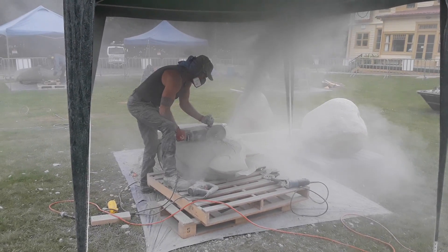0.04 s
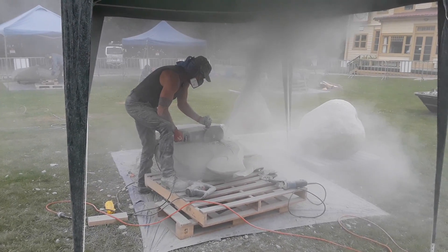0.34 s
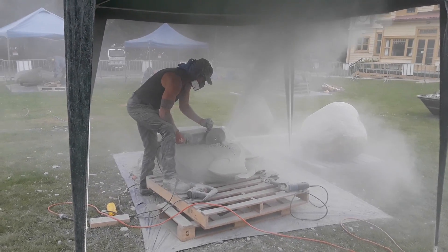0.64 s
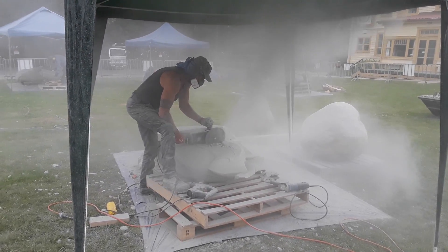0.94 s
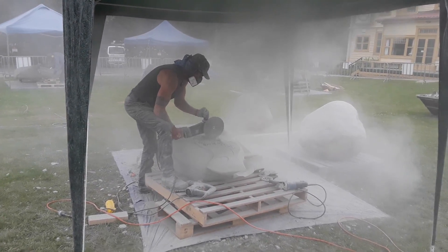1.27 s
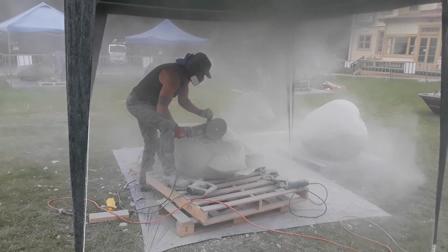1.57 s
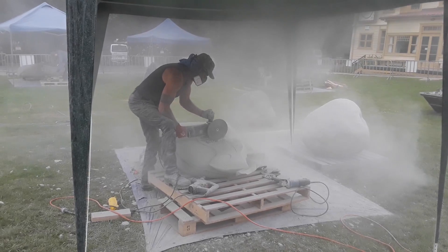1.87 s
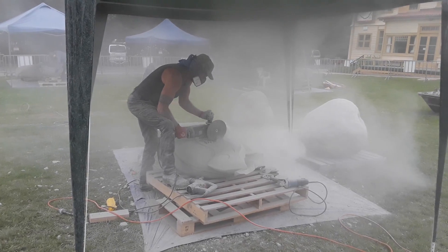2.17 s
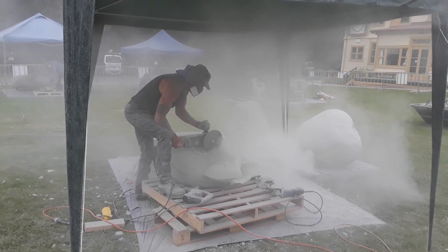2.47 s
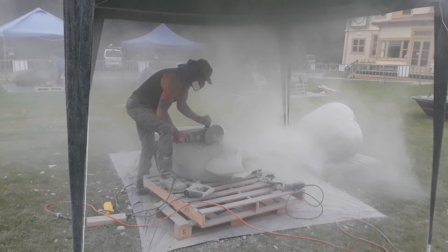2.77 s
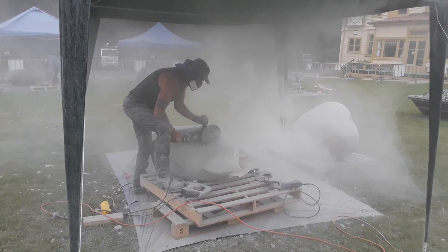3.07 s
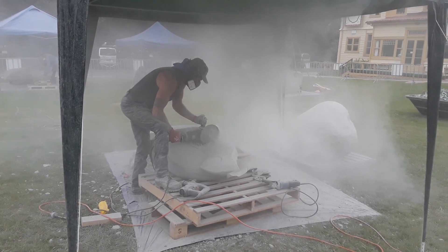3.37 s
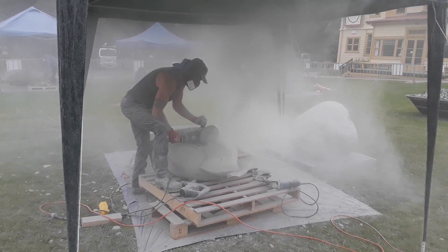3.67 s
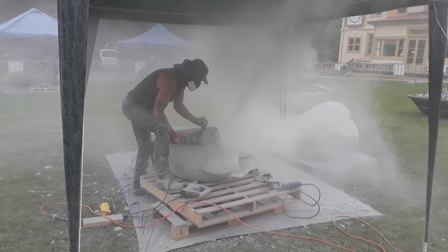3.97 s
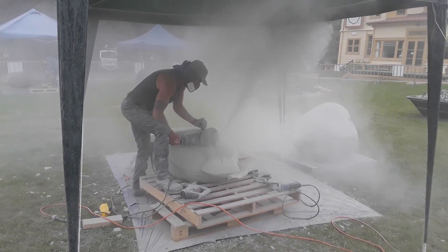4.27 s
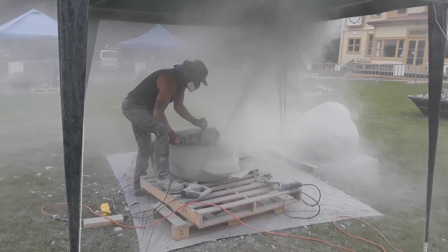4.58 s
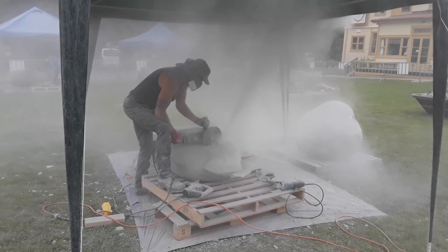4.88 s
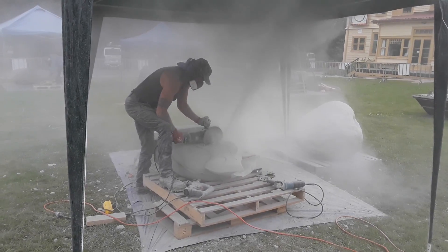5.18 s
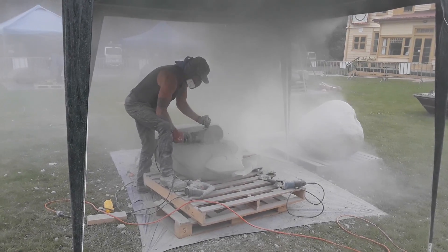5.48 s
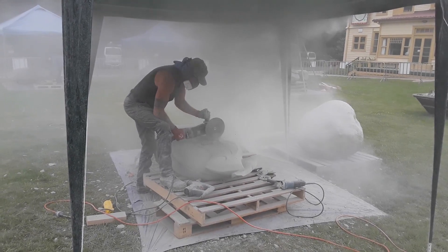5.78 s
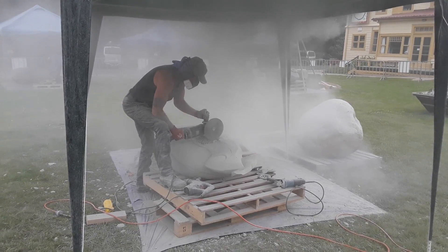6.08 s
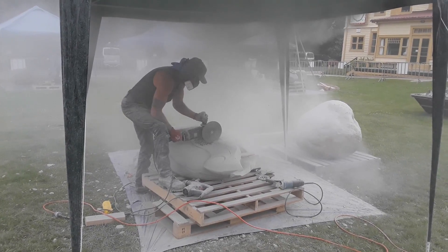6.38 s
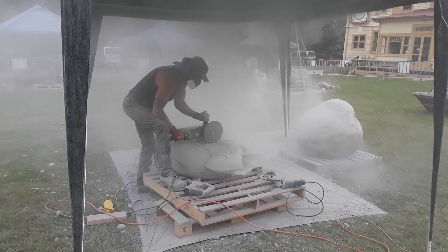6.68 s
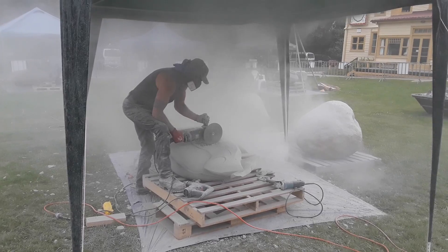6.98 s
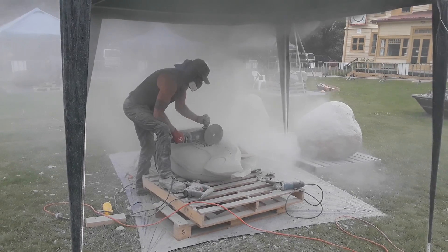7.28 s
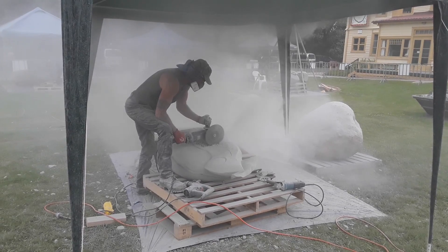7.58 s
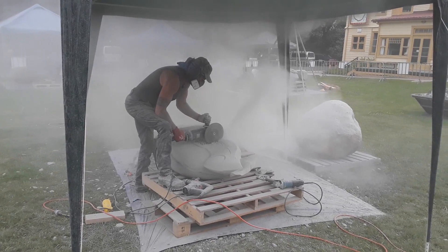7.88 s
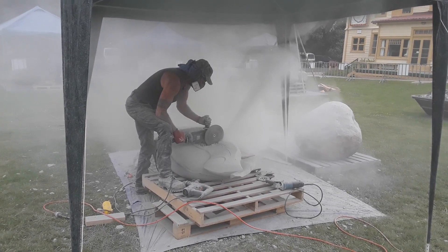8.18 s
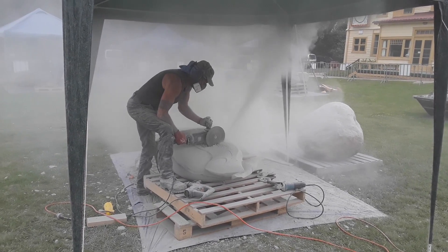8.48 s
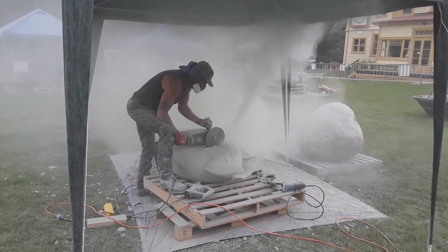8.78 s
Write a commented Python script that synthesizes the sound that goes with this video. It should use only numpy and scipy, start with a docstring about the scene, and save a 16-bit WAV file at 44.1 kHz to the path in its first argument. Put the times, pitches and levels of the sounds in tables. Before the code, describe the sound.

A grinder disc rasps and squeals through a stone block, its motor revving up in two brief pauses and slowing as it digs in.

```python
"""Outdoors, one microphone close to an electric angle grinder cutting a stone block; mono.
At first the rim bites deep and hisses, its grit ringing the steel disc, while the labouring motor hums.
At 1.2 s the disc lifts clear: the motor whines up, the gears rattle, the fan blows. From 1.7 s it skims
and sings, then sinks in and drags the speed down. Near 5.8 s it lifts again over a low drone; at 6.5 s
it comes back squealing and digs in to the end. Now and then a puff of wind catches the microphone."""
import sys
import numpy as np
from scipy import signal
from scipy.fft import rfft, irfft, next_fast_len
from scipy.io import wavfile
from scipy.ndimage import uniform_filter1d, map_coordinates

SR = 44100
rng = np.random.default_rng(int(sys.argv[2]) if len(sys.argv) > 2 else 0)


def bounce(signal):
    """Save signal as a 16-bit WAV file at the path given by the first command-line argument."""
    frames = np.transpose(np.atleast_2d(signal))
    limited = np.clip(frames, -1, 1)
    pcm = np.round(limited * 32767).astype(np.int16)
    wavfile.write(sys.argv[1], SR, pcm)


N = 398663
T = np.arange(N) / SR
SLOW_HZ, FREE_HZ = 59, 84  # turns per second, deep in the stone and running free
CASE_HZ, GRAZE_S = 4096, 0.089  # gear case resonance; how long the rim brushes before it bites


# short jolts and slow, slight swells or dips in the cut's loudness: t/s, half length/s, level change/dB
LEVEL_SWINGS = [(1.114, 0.033, 3.5), (1.733, 0.01, 4.5), (1.867, 0.15, -1), (5.67, 0.036, 0.5),
                (6.467, 0.018, 1), (6.803, .15, 0.5), (7.217, .17, 0.5), (8.4, 0.81, 0.3)]
# spectrum of breaking stone: f/Hz, level/dB
CHIP_SPECTRUM = [(25, -40), (70, -5), (130, -0.5), (300, -0.5), (480, 0), (680, 1.5), (850, -2), (1150, 1),
                 (1600, -8.5), (3000, -40)]

def cutting(speed, bite):
    """The disc in the stone: ringing scrape and crumbling chips, louder the deeper it bites."""
    light = lightness(speed)
    swing_db = sum(db * np.exp(-((T - s) / half_s) ** 2) for s, half_s, db in LEVEL_SWINGS)
    # dust and chips take a moment to build up as a new groove forms
    groove_db = -3.5 * sum((T > back - GRAZE_S) * np.exp(-np.abs(T - back) / 0.12)
                           for _, back, *_ in LIFTS)
    doublings = np.log2(bite)
    scrape_db = -16.17 + 1.1 * doublings + 2.67 * light
    body_db = -20.2 + 0.94 * doublings - light + 0.47 * wobble(14)
    dust_db = -14.34 + 2.15 * doublings - 0.91 * light + groove_db + 0.76 * wobble(25)
    chips_db = -30 + 4.9 * doublings - 3 * light + groove_db
    # a glancing disc chatters, and its runout presses once per turn
    glancing = np.clip(1 - bite / 0.33, 0, 1)
    runout = np.sin(2 * np.pi * np.cumsum(speed) / SR)
    flutter_db = 0.4 * wobble(12) + 0.24 * wobble(45) + 0.38 * wobble(500)
    chatter_db = glancing * (1.5 * wobble(130) + 0.58 * runout)
    pressure = amp(flutter_db + chatter_db + .5 * light * runout)
    scrape = pressure * disc(speed, body_db, scrape_db, dust_db)
    # deep in the stone chips break off at random; a skimming rim buzzes
    chips = rng.standard_normal(N) * amp(3.4 * wobble(420) + 0.75 * wobble(30))
    buzz = 0.72 * light ** 4 * rim(speed, wear_turns=50)
    return amp(swing_db) * (scrape + amp(chips_db) * coloured(chips + buzz, CHIP_SPECTRUM))


# modes of the steel disc: f/Hz when slow, shift/Hz when free, width/Hz, level/dB deep, level/dB skimming
DISC_MODES = [(1404, 10, 35, -15, 19), (1505, 38, 138, -2, 14), (1817, -63, 72, 9.5, 15),
              (1938, -27, 100, 6.5, 11), (2062, 15, 50, 9, 21), (2160, -34, 137, 8, 7),
              (2510, 94, 165, 6.5, 16), (3100, -56, 160, 6, 13), (3208, 51, 69, -1, 17),
              (3617, 68, 58, 0, 21), (3830, 100, 294, -2, 13), (4390, -104, 94, 7.5, 8),
              (4618, 10, 135, 4.5, 20), (5042, -18, 68, -7, 14), (5270, 117, 99, 6, 19),
              (5614, 125, 130, -2, 13), (5885, 34, 51, -5, 15), (6040, 242, 300, -1, 8),
              (6416, 200, 57, 1, 12), (6662, 70, 66, 1, 15), (7193, 21, 117, 4, 10),
              (7417, 200, 109, 5.5, 14), (8170, 37, 370, 5, 7), (8873, 161, 60, 6, 9),
              (9530, 207, 297, 0, 3), (11843, -4, 189, -1, 7), (12683, 223, 70, -2, 7),
              (13245, 193, 120, -2, 2)]
# spectrum of the rim on stone: f/Hz, level/dB
SCRAPE_SPECTRUM = [(600, -20), (1150, -9), (1700, -8), (2300, -6), (3450, -9.5), (4900, -7), (5500, 0.5),
                   (6600, -1.24), (6950, -9.5), (8300, -11.5), (10300, -12.5), (11300, -9), (13300, -1),
                   (15600, -1.5)]
# how strongly the scrape repeats each turn: f/Hz, weight
REPEAT_WEIGHTS = [(200, .12), (900, 0.69), (1500, 0.71), (3000, 0.71), (6000, 0.56), (9000, 0.35),
                  (15000, .4)]

def disc(speed, body_db, scrape_db, dust_db):
    """Repeating and fresh scraping ring the disc; a deep cut damps the modes, and spin shifts them."""
    hz, t, repeating = signal.stft(rim(speed, wear_turns=23.5), SR, nperseg=2048)
    fresh = signal.stft(rng.standard_normal(N), SR, nperseg=2048)[2]
    hz = hz[:, None]
    light = lightness(np.interp(t, T, speed))
    share = np.clip(along(REPEAT_WEIGHTS, hz) * (0.37 + 0.68 * light ** 2), 0, 1)
    scraping = np.sqrt(share) * repeating + np.sqrt(1 - share) * fresh
    power = 1
    for mode_hz, shift_hz, width_hz, deep_db, skim_db in DISC_MODES:
        detune = 2 * (hz - mode_hz - shift_hz * light) / width_hz
        # the angle of the cut drifts, favouring one mode and then another
        mode_db = deep_db + (skim_db - deep_db) * light + 1.7 * wobble(5, t)
        power = power + amp(mode_db) ** 2 / (1 + detune ** 2)
    response = np.sqrt(power) * amp(along(SCRAPE_SPECTRUM, hz)) * hz / np.hypot(hz, 500)
    # the many weak high modes stand out more as the cut lightens
    ripple_depth = along([(1000, 0.26), (4000, 1.0), (9000, 0.44), (14000, 0.97)], hz)
    ripple = ripple_depth * wobble(0.97, hz[:, 0] / 70)[:, None]
    response *= amp((0.9 + 1.7 * light) * ripple)
    # three bands, each at its own level: the disc's body, the scrape, the fine dust
    body = 1 / (1 + (hz / 2900) ** 20)
    dust = 1 / (1 + (7600 / (hz + 1)) ** 20)
    gain = 0
    for band, db in (body, body_db), (1 - body - dust, scrape_db), (dust, dust_db):
        part = response * band
        gain = gain + amp(np.interp(t, T, db)) * part / np.sqrt(np.mean(part ** 2, axis=0))
    return signal.istft(gain * scraping, SR, nperseg=2048)[1][:N]


def rim(speed, wear_turns):
    """The grit pattern of the rim passes once per turn and slowly wears into a new one."""
    grains = 640
    turns = np.cumsum(speed) / SR
    keep = np.exp(-1 / wear_turns)
    grit = rng.standard_normal((2 * grains, grains))
    pattern, _ = signal.lfilter([np.sqrt(1 - keep ** 2)], [1, -keep], grit[1:],
                                axis=0, zi=keep * grit[:1])
    return unit(map_coordinates(pattern.ravel(), [turns * grains], order=3))


# high squeals of the disc and low overtones of its spin: start t/s, end t/s, f/Hz, level/dB
DISC_TONES = [(.06, 0.854, 2080, -27.5), (0.302, .85, 4377, -29.5), (0.879, 1.168, 2104, -23),
              (.9, 1.17, 4400, -22), (1.08, 1.228, 6470, -25), (1.737, 1.87, 2060, -25),
              (1.74, 1.9, 4538, -19.5), (1.76, 1.906, 2530, -26), (1.768, 1.977, 710, -39),
              (1.877, 2.0, 2060, -18.5), (1.89, 1.998, 6530, -22), (2.02, 2.09, 4510, -19),
              (2.133, 2.3, 4631, -25), (2.501, 2.64, 2070, -24), (2.639, 2.73, 1779, -26),
              (2.97, 3.703, 2064, -26), (4.2, 5.2, 4450, -28.5), (5.412, 5.756, 2043, -30),
              (6.448, 7.3, 5380, -26.5), (6.489, 7.666, 2061, -28), (6.551, 7.1, 580, -45),
              (6.6, 7.05, 501, -49), (6.717, 6.9, 2070, -22.5), (6.723, 7.08, 1418, -34),
              (6.967, 7.14, 2630, -27), (7.0, 7.25, 3680, -31), (7.0, 7.48, 7597, -30),
              (7.031, 7.168, 739, -39), (7.052, 7.5, 5750, -26), (7.749, 8.7, 2080, -30)]

def disc_tones(speed):
    """Brief tones swell and die away: high squeals of the disc and low overtones of its spin."""
    out = np.zeros(N + 2 * SR)
    for start, end, hz, db in DISC_TONES:
        t = np.arange(int((end - start + .1) * SR)) / SR
        # a slow, deep cut smears the note
        rough = np.interp(np.interp(start, T, speed), [SLOW_HZ, FREE_HZ], [.6, .12])
        release_db = -60 * np.maximum(t - (end - start), 0) / 0.12
        swell = (1 - np.exp(-t / 0.0056)) * amp(db - 0.3 + release_db + wobble(14, t))
        note = tone(hz, blur_hz=45 + hz * rough / 14, rough=rough, t=t)
        out[round(start * SR):][:len(t)] += swell * note
    return out[:N]


# the disc is lifted clear: lift t/s, back in t/s, scrape fade/s, rattle start t/s,
# tool level change/dB, whistle level/dB, graze level/dB
LIFTS = [(1.2, 1.726, .3, 1.402, -1, -39.5, -45), (5.765, 6.45, 0.205, 5.863, 2, -51, -19)]

def contact():
    """1 while the rim touches the stone: it fades on lifting and returns at once."""
    touching = np.ones(N)
    for lift, back, fade_s, *_ in LIFTS:
        clear = (T > lift) & (T < back)
        touching[clear] = amp(-60 * (T[clear] - lift) / fade_s)
    return uniform_filter1d(touching, size=300)


def graze():
    """Just before it bites, the rim touches too lightly to ring the disc: a dry, fluttering rasp."""
    level = sum(amp(db) * gate(back - GRAZE_S, back, edge_s=.03) for _, back, *_, db in LIFTS)
    rasp = noise([(100, -16), (1000, -9.5), (1700, -1), (3500, 5),
                  (6500, -1), (7500, -11), (10000, -15), (15000, -10)])
    return level * amp(1.8 * wobble(150)) * rasp


# how deep the rim is pressed into the stone: t/s, bite (1 is a full cut)
BITE_DEPTH = [(0.0, 1.004), (0.85, 0.633), (1.02, 0.16), (1.12, 0.469), (1.2, 0.03), (1.73, 0.315),
              (2.15, 0.665), (2.55, 1.037), (4.4, 0.981), (5.2, 0.878), (5.5, 0.144), (5.68, 0.125),
              (5.78, 0.03), (6.45, 0.155), (6.95, 0.231), (7.15, 0.583), (8.0, 1.255), (9.04, 0.862)]

def spindle(touching):
    """The bite, and the turns per second: the load drags the speed down, and inertia makes it lag."""
    idle_hz, drag_hz, inertia_s = 89.78, 31.78, .7
    bite = np.interp(T, *np.transpose(BITE_DEPTH))
    target_hz = idle_hz - drag_hz * bite * touching
    keep = np.exp(-1 / (inertia_s * SR))
    speed, _ = signal.lfilter([1 - keep], [1, -keep], target_hz, zi=[keep * SLOW_HZ])
    return bite, speed


def lightness(speed):
    """0 when the disc is slowed deep in the stone, 1 when it runs free."""
    return np.clip((speed - SLOW_HZ) / (FREE_HZ - SLOW_HZ), 0, 1)


# spectrum of cooling air and brushes: f/Hz, level/dB
FAN_SPECTRUM = [(20, -50), (55, -26), (150, -24), (470, -17), (570, -5.5), (720, -8), (820, -17.5),
                (1250, -11), (1550, -4.5), (2200, 0.5), (2650, -2.5), (3900, 1), (5000, -2.5), (6600, -0.5),
                (6950, -10.5), (9000, -19), (14000, -15.5)]

def motor(speed, load, touching):
    """Fan air and the armature's unbalance grow with speed; the gears whine when unloaded."""
    light = lightness(speed)
    armature_hz = 4.43 * speed
    fan = amp(-29 + 4.5 * light + wobble(90)) * noise(FAN_SPECTRUM)
    unbalance_db = -78 + 32 * light - 4 * touching  # the stone steadies it
    unbalance = amp(unbalance_db) * tone(armature_hz, blur_hz=8.7, rough=.08)
    # twelve pinion teeth mesh per armature turn and excite the gear case
    mesh_hz, case_width_hz = 12 * armature_hz, 1000
    in_tune = 1 / np.hypot(1, 2 * (mesh_hz - CASE_HZ) / case_width_hz)
    mesh = amp(-4) * tone(mesh_hz, blur_hz=110.3, rough=0.53)
    case = (1 - touching) * in_tune * tone(CASE_HZ, blur_hz=50, rough=.3)
    gears = amp(-33.5 - 12 * load + 2.2 * wobble(70)) * in_tune * (mesh + case)
    return fan + unbalance + gears


def rattle(speed):
    """Unloaded gear teeth knock across their play every second turn, each a short, noisy ring."""
    knock_db, spread_db, jitter_s = -17, 2.2, .0015
    out = np.zeros(N + SR)
    t = np.arange(SR // 20) / SR
    envelope = amp(4.5 - 60 * t / .032) * (1 - np.exp(-t / .0014))
    turns = np.cumsum(speed) / SR
    for _, back, _, start, *_ in LIFTS:
        first, last = np.interp([start, back], T, turns)
        for s in np.interp(np.arange(first, last, 2), turns, T):
            late, strength, detune = rng.standard_normal(3)
            hz = CASE_HZ + 12 * (np.interp(s, T, speed) - 77.5) + 35 * detune  # faster rings higher
            ring = np.sin(2 * np.pi * hz * t) + 0.17 * rng.standard_normal(len(t))
            onset = round((s + jitter_s * late) * SR)
            out[onset:][:len(t)] += amp(knock_db + spread_db * strength) * envelope * ring
    return filtered(out[:N], lambda hz: 1 / (1 + (hz / 7000) ** 8))


def whistle():
    """Shortly after each lift the free disc whistles in the air."""
    level = sum(amp(db) * gate(lift + .27, back, edge_s=.08) for lift, back, *_, db, _ in LIFTS)
    return level * (tone(7160, blur_hz=40.6, rough=0.27) + amp(2) * tone(6355, blur_hz=90.4, rough=0.8))


# puffs of wind on the microphone: t/s, peak level/dB
WIND_PUFFS = [(.52, -35), (2.57, -31), (2.8, -32), (3.05, -27), (3.44, -35), (4.38, -38), (4.67, -38),
              (7.68, -29), (7.95, -35), (8.23, -32), (8.65, -32), (8.93, -30)]

def wind():
    """Brief puffs buffet the microphone over a faint, steady rumble."""
    puffs = sum(amp(db) * np.exp(-((T - s) / 0.019) ** 2) for s, db in WIND_PUFFS)
    rumble = noise([(15, -26), (30, -12), (55, -2), (110, -3.5), (200, -6.5), (500, -15), (2000, -90)])
    return (puffs + amp(-64)) * rumble


def drone():
    """Around the second lift a low drone swells and sags in pitch."""
    span_s = 5.5, 6.5
    hz = np.interp(T, span_s, [60, 56.5])
    db = np.interp(T, span_s, [-57, -46.5])
    return gate(*span_s, edge_s=0.19) * amp(db) * hum(hz, octave_db=1)


def mains(speed):
    """A mains hum that grows as the motor labours."""
    return amp(-53 - 21 * lightness(speed)) * hum(60, octave_db=-6)


def hum(hz, octave_db):
    """A wavering low tone and its octave."""
    return tone(hz, blur_hz=5.2, rough=.2) + amp(octave_db) * tone(2 * hz, blur_hz=6, rough=0.089)


def tone(hz, blur_hz, rough, t=T):
    """A tone of rms 1 on a pitch curve; rough is the part smeared over blur_hz."""
    phase = 2 * np.pi * np.cumsum(hz * np.ones(len(t))) / SR
    in_phase = (1 - rough + rough * wobble(blur_hz, t)) * np.sin(phase)
    return unit(in_phase + rough * wobble(blur_hz, t) * np.cos(phase))


def noise(spectrum):
    """Noise of rms 1 with a (f/Hz, level/dB) spectrum."""
    return coloured(rng.standard_normal(N), spectrum)


def coloured(x, spectrum):
    """x through a (f/Hz, level/dB) spectrum, at rms 1."""
    return unit(filtered(x, lambda hz: amp(along(spectrum, hz))))


def filtered(x, response):
    """x times a response of frequency."""
    size = next_fast_len(N + 8192)
    return irfft(rfft(x, size) * response(np.fft.rfftfreq(size, 1 / SR)), size)[:N]


def wobble(rate, t=T):
    """A smooth random curve with rate knots a second."""
    knots = rng.standard_normal(int(t[-1] * rate) + 4)
    fine = np.arange(0, len(knots) - 1, 1 / 8)
    return np.interp(t * rate, fine, map_coordinates(knots, [fine], order=2))


def gate(start, end, edge_s):
    """1 from start to end, with soft edges."""
    return np.clip(np.minimum(T - start, end - T) / edge_s + .5, 0, 1)


def along(points, hz):
    """(f/Hz, value) points read on a log axis."""
    f, values = np.transpose(points)
    return np.interp(np.log(hz + 1), np.log(f + 1), values)


def amp(db):
    """Decibels to gain."""
    return 10 ** (np.asarray(db) / 20)


def unit(x):
    """Scale to rms 1."""
    return x / np.sqrt(np.mean(x ** 2) + 1e-20)


def scene():
    """The grinder close up in open air, hum and wind beneath it, alike in both channels."""
    touching = contact()
    bite, speed = spindle(touching)
    # raised from the stone, the tool reaches the microphone a little softer or louder
    raised_db = sum(db * gate(lift, back, edge_s=0.51) for lift, back, _, _, db, *_ in LIFTS)
    tool = amp(raised_db) * (motor(speed, bite * touching, touching) + rattle(speed))
    cut = touching * cutting(speed, bite) + graze() + disc_tones(speed)
    mono = cut + tool + whistle() + mains(speed) + drone() + wind()
    return np.array([mono, mono])


def record(dry):
    """The mono microphone rounds off the highest peaks and keeps nothing above its band limit."""
    top_hz = 15830
    mono = dry.mean(axis=0)
    rounded = mono / (1 + mono ** 6) ** (1 / 6)
    mono = filtered(rounded, lambda hz: hz < top_hz)
    return np.array([mono, mono])


dry = scene()
out = record(dry)
bounce(out)
```